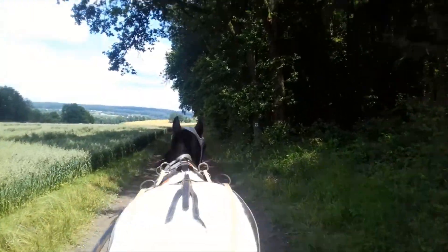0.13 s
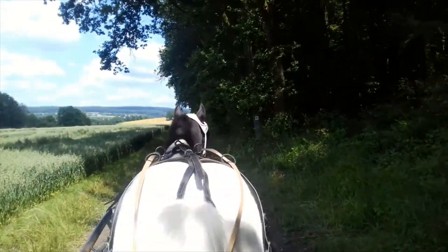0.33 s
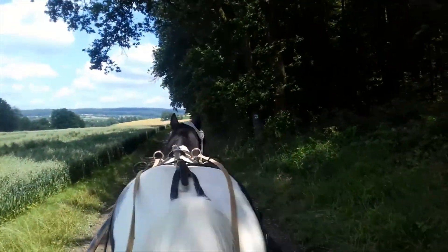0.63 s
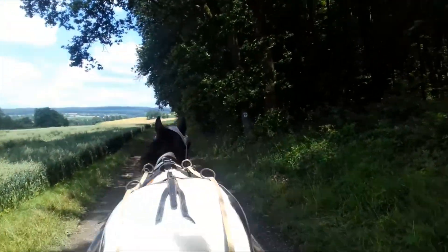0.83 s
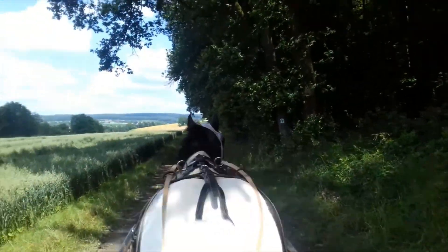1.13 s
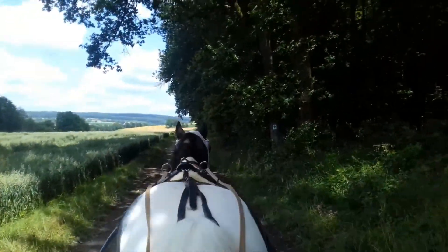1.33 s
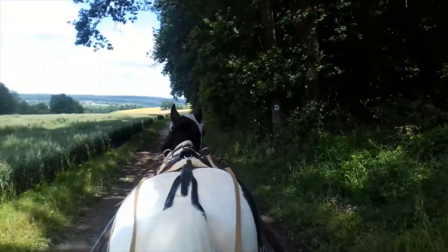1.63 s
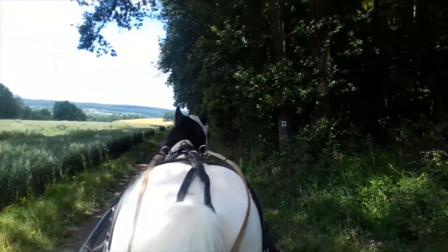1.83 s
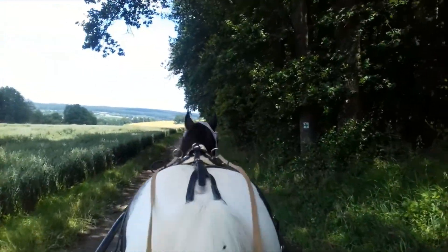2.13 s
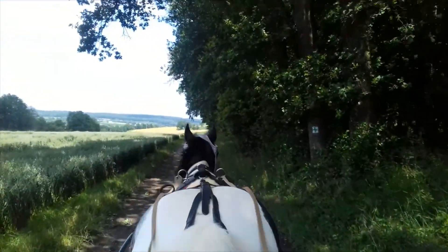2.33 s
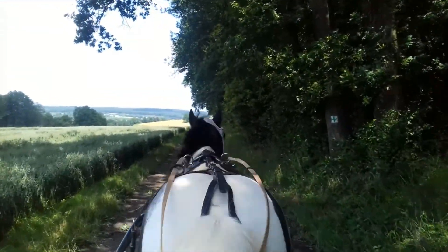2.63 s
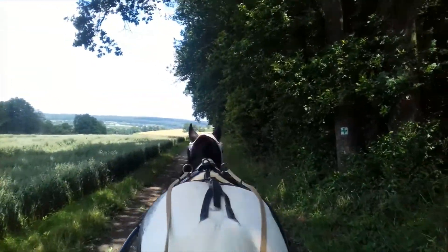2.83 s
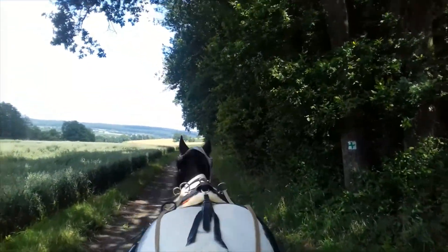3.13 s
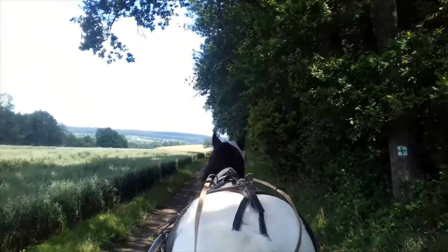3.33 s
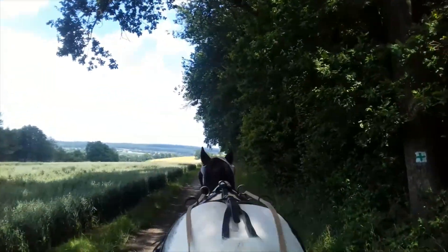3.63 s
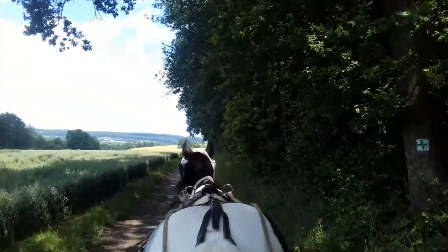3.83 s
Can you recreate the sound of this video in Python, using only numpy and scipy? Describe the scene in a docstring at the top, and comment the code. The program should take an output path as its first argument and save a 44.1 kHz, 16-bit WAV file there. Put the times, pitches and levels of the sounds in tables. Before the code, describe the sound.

Horse-drawn cart rolling along a field path, with dull hoof thuds, harness clinks and buffeting wind.

```python
"""A pony walks a grassy track, heard from the seat of the cart it pulls: hooves knock as resonant noise pushes.
The wheels rumble and crunch as coloured noise, random clicks and tiny ringing stones.
Cart and harness clank and rattle through frame modes, clink in narrow bands, squeak as jittered tones.
Gusts hit the microphone as pressure swings with a rough wake; leaves and grass rustle as noise.
A small bird sings faintly in gliding sines, smeared by the trees."""
import sys
import numpy as np
from scipy import signal
from scipy.fft import rfft, irfft, next_fast_len
from scipy.io import wavfile
from scipy.ndimage import uniform_filter1d

SR = 44100
rng = np.random.default_rng(int(sys.argv[2]) if len(sys.argv) > 2 else 0)


def transcribe(u):
    """Save the signal u as a 16-bit wav file named by the first command-line argument.

    u: samples, shape (n,) or (channels, n), limited to [-1, 1]; the rate is SR.
    q: integer samples, one column per channel.
    """
    v = np.clip(np.atleast_2d(u).T, -1, 1)
    q = np.round(v * 32767).astype(np.int16)
    wavfile.write(sys.argv[1], SR, q)


N = 176400
SHORT_S = np.arange(SR // 4) / SR  # time axis of one event
BLOW_S = .01  # reference length for the energy of a blow
TOP_HZ = 15800

# Leaves and grass, spectrum. Each row: frequency in Hz, gain in dB.
AIR_COLOUR = [(240, -22.5), (500, 3), (750, -12), (1070, 5.5), (1300, 2), (2250, 3), (3200, -14.5),
              (4400, -2), (6100, -14), (7200, -21.5), (15500, -34.5)]
AIR_DB, AIR_SWAY_DB = -43.5, 2.5

# Wheel rumble over time. Each row: time in seconds, level in dB before RUMBLE_TRIM_DB.
RUMBLE_LEVEL = [(0.0, -29.5), (0.41, -36.5), (0.66, -37.5), (0.88, -42.5), (1.06, -39.5), (1.97, -40.5),
                (2.16, -39), (2.34, -43), (2.57, -41), (2.68, -34), (3.1, -40.5), (3.27, -37), (3.54, -35),
                (3.69, -39.5), (3.82, -35.5), (4.0, -26.5)]
# Wheel rumble, spectrum. Each row: frequency in Hz, gain in dB.
RUMBLE_COLOUR = [(20, -64), (45, -10.5), (70, -1.5), (105, 3), (210, 4), (300, -3.5), (450, -15.5),
                 (900, -16.5), (2000, -80)]
RUMBLE_TRIM_DB = 1

# Wheels on grit over time. Each row: time in seconds, common level of grit and stones in dB before their trims.
CRUNCH_LEVEL = [(0.0, -53), (0.55, -47), (0.72, -47), (1.01, -53), (1.3, -48.5), (1.85, -51.5), (2.07, -56),
                (2.19, -46), (2.43, -52), (2.67, -45), (2.93, -48), (3.18, -61), (3.32, -46), (3.5, -57),
                (3.79, -54), (4.0, -45.5)]
# Grit, spectrum. Each row: frequency in Hz, gain in dB.
GRIT_COLOUR = [(300, -37), (700, -6), (1100, 9), (2200, 13), (3100, 6.5), (4300, -16), (6000, 9),
               (7500, -20), (10000, -6), (13000, -20), (16000, -10)]
GRIT_TRIM_DB, GRIT_PER_S, GRIT_SPREAD_DB, GRIT_SURGE_DB = -3, 230, 4, 2.5
# Stones, spectrum. Each row: frequency in Hz, gain in dB.
STONE_COLOUR = [(900, -1), (2200, -1.5), (3100, -7), (4800, -2.5), (7500, -13), (13000, -20.5)]
STONES_PER_S, STONE_TRIM_DB, STONE_SPREAD_DB = 120, 1, 5.5
STONE_LOW_HZ, STONE_HIGH_HZ = 900, 13000
STONE_RING_S, STONE_CYCLES = .0011, 3  # decay: fixed part plus a number of cycles
JIGGLE_DB, JIGGLE_PER_S, JIGGLE_SPREAD_DB = -48, 130, 9.7
JIGGLE_COLOUR = [(1000, -2.5), (2200, 16), (4000, -3.5)]  # (Hz, dB)

# Bird notes. Each row: start in seconds, length in seconds, start in Hz, end in Hz, level in dB.
CHIRPS = [(3.256, 0.044, 4400, 3890, -42), (3.349, 0.038, 3920, 4380, -44.5), (3.518, .05, 5230, 3570, -43),
          (3.583, 0.016, 4200, 4370, -39.5), (3.629, 0.031, 5450, 4000, -41.5),
          (3.683, 0.022, 4100, 3890, -39), (3.722, .025, 5500, 4300, -44), (3.809, 0.023, 5450, 3680, -43),
          (3.875, .016, 4150, 4350, -41.5), (3.893, 0.031, 5450, 3770, -45)]
TREES_DB, TREES_DECAY_S = -2, 0.12

# Gusts on the microphone. Each row: start in seconds, length in seconds, level in dB, central eddy pitch in Hz.
GUSTS = [(0.0, 0.095, -26, 176), (0.096, 0.046, -21, 270), (.18, 0.025, -28.5, 238),
         (0.212, 0.021, -25, 268), (.412, .024, -25, 254), (.472, 0.027, -26, 293),
         (.513, .022, -25.5, 258), (1.22, 0.036, -29.5, 216), (1.625, 0.099, -35.5, 137),
         (2.722, 0.047, -23.5, 260), (3.118, 0.027, -16, 258), (3.152, 0.054, -22, 212),
         (3.42, 0.028, -22, 180), (3.574, 0.026, -25, 201), (3.605, 0.069, -14, 317),
         (3.674, 0.051, -25, 215), (3.885, 0.022, -23, 184), (3.911, .028, -13, 251),
         (3.934, 0.041, -13, 390)]
# Single hard puffs of air. Each row: time in seconds, drive before colouring in dB, pitch in Hz.
PUFFS = [(.102, -28, 523), (0.12, -9, 438), (0.189, -6.5, 255), (.197, 0, 438), (0.268, -16, 160),
         (.322, -15, 226), (.342, -13.5, 202), (0.364, -14, 248), (0.43, -17, 470), (.457, -13.5, 298),
         (0.473, -20, 398), (0.496, -22, 320), (.515, -12, 322), (1.613, -14, 183), (2.288, -18, 183),
         (2.563, -19, 144), (2.731, -12, 330), (2.804, -16, 172), (3.114, -6.5, 314), (3.144, -8.5, 450),
         (3.372, -13, 214), (3.434, -17.5, 276), (3.608, -11.5, 440), (3.643, -7, 410), (3.666, -21, 520),
         (3.752, -14.5, 344), (3.852, -6, 253), (3.911, -7, 475), (3.948, -3, 770), (3.957, -15, 715)]
# Gusts and puffs, spectrum. Each row: frequency in Hz, gain in dB.
WIND_COLOUR = [(25, -31), (60, -9.5), (120, 1), (300, 1), (600, -3), (1200, 3), (2200, 10.5), (4000, -14),
               (8000, -38)]
# Rough wake, spectrum. Each row: frequency in Hz, gain in dB.
WAKE_COLOUR = [(100, -13), (350, 1.5), (800, -5.5), (2500, -31.5), (6000, -69)]
EDDIES_PER_S, EDDY_OCTAVES, EDDY_CYCLES, EDDY_SPREAD_DB = 280, 0.92, .2, 0.5
EDDY_LEAD_S = 1 / 50  # time ahead of an eddy's centre
WAKE_DB, WAKE_S = -13, .012

# Squeaks of fittings. Each row: start in seconds, length in seconds, start in Hz, end in Hz,
# level in dB, overtones in dB.
SQUEAKS = [(0.285, 0.045, 3460, 4020, -34.5, -12), (0.501, .025, 2520, 2720, -41, -27),
           (1.039, 0.02, 4030, 4104, -31, -34), (1.409, 0.035, 4080, 3930, -32, -33),
           (1.73, 0.048, 3620, 3560, -35, -13), (1.768, 0.04, 3350, 4190, -29.5, -16),
           (1.865, 0.022, 4140, 4020, -25, -33), (1.871, 0.027, 3380, 2760, -37, -21)]
SQUEAK_JITTER, SQUEAK_SLIDE_JITTER = 0.017, .2  # ratios; the second per natural log of the slide
SQUEAK_FLICKER_DB, SQUEAK_RING_DB, SQUEAK_RING_S = 3.5, -8, 0.031
# Thin rubs of a wheel. Each row: start in seconds, length in seconds, level in dB.
RUBS = [(0.83, 0.051, -34.5), (2.933, 0.076, -34.5), (3.38, 0.063, -39.5)]
RUB_HZ, RUB_JITTER = 2353, 0.017

# Chain link ticks. Each row: time in seconds, level in dB, pitch in Hz.
TINKS = [(2.521, -36, 7830), (2.614, -45, 8170), (2.877, -62, 8300), (2.946, -41.5, 8100),
         (3.216, -53, 7700), (3.274, -52, 7900), (3.314, -59, 8100)]
# Modes of a chain link. Each row: ratio to the pitch, level in dB.
TINK_MODES = [(1, 5.5), (1.1, -5), (1.48, -17), (1.62, -18)]
TINK_PUSH_S, TINK_WIDTH_HZ = 0.0018, 120
# Pings of a small harness ring. Each row: time in seconds, level in dB.
PINGS = [(0.844, -51), (1.522, -50), (2.046, -49), (3.042, -48.5)]
PING_HZ, PING_DECAY_S, PING_SPREAD_HZ = 8460, 0.066, 122
# Clinks of buckles and rings. Each row: time in seconds, level in dB, pitch in Hz.
CLINKS = [(.349, -22, 1843), (.459, -33, 1535), (.707, -25, 1116), (1.073, -33, 1820), (2.96, -26, 1165),
          (3.329, -28.5, 1674)]
CLINK_PUSH_S, CLINK_WIDTH_HZ = 0.0051, 28

# Dry snaps of tack and twigs. Each row: time in seconds, level in dB, pitch in Hz.
SNAPS = [(.575, -41, 4500), (.702, -38, 5500), (.916, -41, 4500), (1.068, -42, 4800), (1.46, -38, 5000),
         (1.473, -39, 4500), (1.832, -34, 4800), (2.207, -36, 5500), (2.71, -16.5, 1900),
         (2.923, -35, 5200), (3.691, -33, 5200)]
SNAP_DECAY_S, SNAP_SPLINTER_DB, SNAP_WIDTH_RATIO = 0.0025, -5, .65
# Bouts of harness and cart rattle. Each row: centre in seconds, length in seconds, level in dB, main ring in Hz.
RATTLES = [(0.297, 0.079, -42, 1740), (0.347, 0.033, -30, 1810), (0.63, 0.029, -33.5, 1430),
           (0.714, 0.038, -29.5, 1350), (.765, 0.037, -42.5, 1830), (1.074, 0.045, -32.5, 1700),
           (1.254, 0.11, -38, 2120), (1.473, 0.073, -32.5, 1470), (1.585, 0.045, -40, 1400),
           (1.826, 0.083, -31.5, 1490), (2.018, 0.042, -35, 2330), (2.21, 0.078, -29.5, 2260),
           (2.539, 0.047, -34, 1910), (2.598, 0.079, -33, 1570), (2.959, 0.048, -28, 1540),
           (3.089, 0.027, -32.5, 2050), (3.333, 0.052, -33, 1660), (3.7, 0.08, -30, 1400)]
RATTLE_WIDTH_HZ, RATTLE_PER_S, RATTLE_SPREAD_DB = 550, 550, 2.5
RATTLE_FRAME_DB, RATTLE_GRIT_DB = -3.5, -0.5
RATTLE_COLOUR = [(1500, -1.0), (2500, -4.0), (4000, -11.5)]  # (Hz, dB)

# Clanks of shafts and fittings. Each row: time in seconds, level below the split in dB, level above it in dB.
CLANKS = [(0.059, -31, -35.5), (0.702, -50, -41.5), (.835, -53, -39), (1.515, -33.5, -29.5),
          (1.828, -36, -35), (2.043, -15.5, -20), (2.14, -31, -40), (2.294, -45, -37), (2.496, -34, -40),
          (2.778, -19, -20.5), (2.79, -23.5, -36), (2.944, -39, -33), (3.037, -31, -32),
          (3.272, -29.5, -43), (3.668, -34.5, -38), (3.993, -26, -35.5)]
# Modes of the cart's frame. Each row: frequency in Hz, level in dB, t60 in seconds.
FRAME = [(270, -1.5, 0.05), (493.7, -12.5, 0.15), (683, -20.5, 0.3), (1071, -3, 0.082), (1161.5, -11, 0.26),
         (1403, -3.5, 0.039), (1498, -2.5, 0.096), (1838, -4.5, 0.07), (2225, -10.5, 0.14),
         (2700, -8, 0.058), (3000, -6, .04), (3266, -9.5, 0.12), (4020, 4.5, 0.039), (4170, 0, 0.054),
         (4480, 2.5, 0.043), (4575, 6.5, 0.031), (5040, -4.5, 0.031), (5490, 4.5, 0.014),
         (6210, -7.5, 0.056)]
# Crack of a clank, spectrum. Each row: frequency in Hz, gain in dB.
CRACK_COLOUR = [(200, -44), (500, -9.5), (1000, -6.5), (1500, -3), (2300, 3), (3100, -9), (4300, 12.5),
                (5800, 5.5), (7200, -15), (10000, -15), (15000, -72)]
CLANK_HOLD_S, CLANK_DECAY_S, CLANK_TAIL_DB, CLANK_TAIL_S = 0.0014, 0.012, -19.5, 0.062
CLANK_SPLIT_HZ, CRACK_DB = 2500, -3
FRAME_DETUNE = .009  # largest shift of a mode, as a ratio

# Hoof knocks. Each row: time in seconds, level in dB, pitch in Hz.
HOOVES = [(.469, -32.5, 830), (.803, -35.5, 870), (.843, -31.5, 784), (1.544, -32, 834),
          (1.596, -31.5, 786), (1.918, -35.5, 1080), (1.962, -28.5, 970), (2.291, -32.5, 980),
          (2.299, -36.5, 800), (2.337, -28.5, 790), (2.344, -40.5, 850), (2.537, -36, 1000),
          (2.699, -32, 744), (3.038, -32.5, 890), (3.082, -28, 930), (3.451, -33.5, 805), (3.836, -31, 700)]
# Scuff of the soil, spectrum. Each row: frequency in Hz, gain in dB.
SCUFF_COLOUR = [(300, 3), (1000, 18.5), (2500, 14), (5000, -31), (8000, -16), (15000, -35)]
HOOF_DECAY_S, HOOF_WIDTH_RATIO, HOOF_SCUFF_DB, HOOF_CRUSH_DB = 0.0091, 0.29, -6, 2


def undb(db):
    """Decibels to gain."""
    return 10 ** (np.asarray(db) / 20)


def unit(x):
    """Scale to rms 1."""
    return x / np.sqrt(np.mean(x ** 2) + 1e-20)


def burst(x, seconds):
    """Scale so that the energy equals rms 1 held for the given time."""
    return x * np.sqrt(seconds * SR / (np.sum(x ** 2) + 1e-20))


def add(out, start_s, x):
    """Mix a sound in at a time, not before zero."""
    i = max(int(start_s * SR), 0)
    out[i:i + len(x)] += x[:max(len(out) - i, 0)]


def colour(x, points):
    """Causal minimum-phase filter through (Hz, dB) points, by folding the cepstrum."""
    n = next_fast_len(len(x) + 2048, True) // 2 * 2
    hz, db = np.array(points, float).T
    bin_hz = np.arange(n // 2 + 1) * SR / n
    log_gain = np.interp(np.log(bin_hz + 1), np.log(hz), db) * np.log(10) / 20
    cepstrum = irfft(log_gain, n)
    cepstrum[1:n // 2] *= 2
    cepstrum[n // 2 + 1:] = 0
    return irfft(rfft(x, n) * np.exp(rfft(cepstrum)), n)[:len(x)]


def band(x, hz, width_hz):
    """One resonance."""
    return signal.lfilter(*signal.iirpeak(hz, hz / width_hz, fs=SR), x)


def walk(rate_hz, size=N):
    """Smooth random wander of rms 1."""
    k = max(int(SR / rate_hz), 1)
    own_rng = np.random.default_rng(rng.integers(2 ** 31))
    steps = np.repeat(own_rng.standard_normal(size // k + 1), k)
    return unit(uniform_filter1d(uniform_filter1d(steps, k), k)[:size])


def clicks(per_s, spread_db, size=N):
    """Random tiny impacts, a few much harder than the rest."""
    hard = np.minimum(rng.exponential(size=size), 3.2)
    hits = rng.random(size) < per_s / SR
    return hits * np.sign(rng.standard_normal(size)) * undb(spread_db * hard)


def arch(t, length):
    """A smooth rise and fall."""
    return np.sin(np.pi * np.clip(t / length, 0, 1))


def noise_push(decay_s):
    """Decaying noise."""
    return rng.standard_normal(len(SHORT_S)) * np.exp(-SHORT_S / decay_s)


def sine(hz):
    """Sine that follows a frequency track."""
    return np.sin(2 * np.pi * np.cumsum(hz) / SR)


def frame(x):
    """The cart's frame rings in close, beating pairs of modes, detuned afresh each time as its joints work."""
    ring = np.zeros(len(SHORT_S))
    for hz, db, t60_s in FRAME:
        decay = undb(-60 * SHORT_S / t60_s)
        for side, (shift, phase) in zip((-1, 1), rng.random((2, 2))):
            mode_hz = hz * (1 + side * FRAME_DETUNE * shift)
            ring += undb(db) * np.sin(2 * np.pi * (mode_hz * SHORT_S + phase)) * decay
    return signal.fftconvolve(x, ring)[:len(x)]


def stones(per_s, size=N):
    """Small hard things crack together, each with its own pitch and a very short ring."""
    out, t = np.zeros(size), SHORT_S[:SR // 40]
    for when, pitch, force in rng.random((int(per_s * size / SR), 3)):
        hz = STONE_LOW_HZ * (STONE_HIGH_HZ / STONE_LOW_HZ) ** pitch
        hard = min(-np.log(1 - force), 3)
        ring = np.sin(2 * np.pi * hz * t) * np.exp(-t / (STONE_RING_S + STONE_CYCLES / hz))
        add(out, when * size / SR, undb(STONE_SPREAD_DB * hard) * ring)
    return unit(colour(out, STONE_COLOUR))


def leaves():
    """Leaves and grass rustle: coloured noise with a swaying level."""
    sway = undb(AIR_DB + AIR_SWAY_DB * walk(18))
    return sway * unit(colour(rng.standard_normal(N), AIR_COLOUR))


def bird():
    """Soft slurs, then falling whistles with short notes between: gliding sines smeared by the trees."""
    out = np.zeros(N)
    for start_s, length_s, from_hz, to_hz, db in CHIRPS:
        hz = from_hz * (to_hz / from_hz) ** np.minimum(SHORT_S / length_s, 1)
        add(out, start_s, undb(db) * unit(sine(hz)) * arch(SHORT_S, length_s))
    trees = burst(noise_push(TREES_DECAY_S), 1 / SR)
    return out + undb(TREES_DB) * signal.fftconvolve(out, trees)[:N]


def eddy(t, hz, phase):
    """A swirl of air crosses the microphone: one sharp swing of pressure."""
    return np.cos(2 * np.pi * hz * t + phase) / np.cosh(np.clip(t * hz / EDDY_CYCLES, -20, 20))


def wind():
    """Gusts are flurries of eddies of mixed size; some come alone, and all stir up a fine rough wake."""
    out = np.zeros(N)
    t = SHORT_S[:SR // 7] - EDDY_LEAD_S
    for start_s, length_s, db, hz in GUSTS:
        gust = np.zeros(len(t))
        count = max(int(length_s * EDDIES_PER_S), 2)
        for k, (shift, size, turn, force) in enumerate(rng.uniform(-0.924, 1, (32, 4))[:count]):
            place = np.clip((k + .5 + shift) / count, 0, 1)
            swing = eddy(t - place * length_s, hz * 2 ** (EDDY_OCTAVES * size), np.pi * turn)
            gust += undb(EDDY_SPREAD_DB * force) * arch(place, 1) ** 0.098 * swing
        add(out, start_s - EDDY_LEAD_S, undb(db) * burst(colour(gust, WIND_COLOUR), length_s))
    for when_s, db, hz in PUFFS:
        puff = eddy(t, hz, rng.uniform(-0.47, 1))
        add(out, when_s - EDDY_LEAD_S, undb(db) * colour(puff, WIND_COLOUR))
    strength = np.sqrt(np.abs(uniform_filter1d(out ** 2, int(WAKE_S * SR))))
    wake = unit(colour(rng.standard_normal(N), WAKE_COLOUR))
    return out + undb(WAKE_DB) * strength * wake


def squeaks():
    """Stick-slip in the fittings: short rough tones with overtones, which leave a noisy ring."""
    out = np.zeros(N)
    for start_s, length_s, from_hz, to_hz, db, overtone_db in SQUEAKS:
        # rougher the further it slides
        jitter = SQUEAK_JITTER + SQUEAK_SLIDE_JITTER * abs(np.log(to_hz / from_hz))
        glide_hz = np.interp(SHORT_S, [0, length_s], [from_hz, to_hz])
        hz = glide_hz * (1 + jitter * walk(1400, size=len(SHORT_S)))
        overtones = sine(2 * hz) + undb(-10) * sine(3 * hz)
        flicker = undb(SQUEAK_FLICKER_DB * walk(570, size=len(SHORT_S)))
        tone = (sine(hz) + undb(overtone_db) * overtones) * arch(SHORT_S, length_s) ** 1.35 * flicker
        ring = signal.fftconvolve(tone, noise_push(SQUEAK_RING_S))[:len(SHORT_S)]
        sound = burst(tone, length_s / 2) + undb(SQUEAK_RING_DB) * burst(ring, length_s / 2)
        add(out, start_s, undb(db) * sound)
    return out


def rubs():
    """A wheel rubs by stick-slip: a thin tone of jittering pitch."""
    out = np.zeros(N)
    for start_s, length_s, db in RUBS:
        hz = RUB_HZ * (1 + RUB_JITTER * walk(522, size=len(SHORT_S)))
        add(out, start_s, undb(db) * unit(sine(hz)) * arch(SHORT_S, length_s))
    return out


def tinks():
    """Chain links touch: tiny bright ticks with a few short modes."""
    out = np.zeros(N)
    for when_s, db, hz in TINKS:
        push = noise_push(TINK_PUSH_S)
        ring = np.zeros(len(SHORT_S))
        for ratio, mode_db in TINK_MODES:
            mode = band(band(push, hz * ratio, TINK_WIDTH_HZ), hz * ratio, hz / 2)
            ring += undb(mode_db) * unit(mode)
        add(out, when_s, undb(db) * burst(ring, BLOW_S / 2))
    return out


def pings():
    """A small harness ring pings high: four close sines beat and decay."""
    out = np.zeros(N)
    for when_s, db in PINGS:
        mode_hz = PING_HZ + PING_SPREAD_HZ * rng.standard_normal(size=4)
        ping = sum(np.sin(2 * np.pi * hz * SHORT_S) for hz in mode_hz)
        add(out, when_s, undb(db) * burst(ping * np.exp(-SHORT_S / PING_DECAY_S), BLOW_S))
    return out


def clinks():
    """A buckle or ring chatters briefly, a noise push, and sounds its one note."""
    out = np.zeros(N)
    for when_s, db, hz in CLINKS:
        note = band(band(noise_push(CLINK_PUSH_S), hz, CLINK_WIDTH_HZ), hz, hz / 2)
        add(out, when_s, undb(db) * burst(note, BLOW_S))
    return out


def snaps():
    """Tack and twigs snap: an impulse and splintering noise through a broad resonance."""
    out = np.zeros(N)
    for when_s, db, hz in SNAPS:
        tick = undb(SNAP_SPLINTER_DB) * burst(noise_push(SNAP_DECAY_S), 1 / SR)
        tick[0] += 1
        width_hz = hz * SNAP_WIDTH_RATIO
        add(out, when_s, undb(db) * burst(band(band(tick, hz, width_hz), hz, width_hz), BLOW_S / 4))
    return out


def rattles():
    """Buckles, chains and boards shake in bouts: clicks ring a band and the frame, amid tiny cracks."""
    out = np.zeros(N)
    for centre_s, length_s, db, hz in RATTLES:
        bout = arch(SHORT_S, length_s)
        shake = clicks(RATTLE_PER_S, RATTLE_SPREAD_DB, size=len(SHORT_S)) * bout
        own_ring = band(band(shake, hz, RATTLE_WIDTH_HZ), hz, hz)
        frame_ring = frame(colour(shake, RATTLE_COLOUR))
        cracks = stones(2 * RATTLE_PER_S, size=len(SHORT_S)) * bout
        sound = unit(own_ring)
        sound += undb(RATTLE_FRAME_DB) * unit(frame_ring)
        sound += undb(RATTLE_GRIT_DB) * unit(cracks)
        add(out, centre_s - length_s / 2, undb(db) * burst(sound, length_s / 2))
    return out


def clanks():
    """Loose metal chatters against the frame for a moment and leaves it ringing."""
    out = np.zeros(N)
    push = np.exp(-np.maximum(SHORT_S - CLANK_HOLD_S, 0) / CLANK_DECAY_S)
    tail = undb(CLANK_TAIL_DB) * np.exp(-SHORT_S / CLANK_TAIL_S)
    for when_s, body_db, bright_db in CLANKS:
        chatter = clicks(5000, 0.5, size=len(SHORT_S))
        crack = colour(chatter * (push + tail), CRACK_COLOUR)
        hit = unit(frame(chatter * push)) + undb(CRACK_DB) * unit(crack)
        for side, db in (("low", body_db), ("high", bright_db)):
            part = signal.sosfilt(signal.butter(3, CLANK_SPLIT_HZ, side, fs=SR, output="sos"), hit)
            add(out, when_s, undb(db) * burst(part, 2 * BLOW_S))
    return out


def rumble():
    """The wheels rumble: low noise under a level curve with a small wander."""
    level_db = np.interp(np.arange(N) / SR, *np.array(RUMBLE_LEVEL).T)
    level = undb(level_db + RUMBLE_TRIM_DB + 0.5 * walk(23.47))
    return unit(colour(rng.standard_normal(N), RUMBLE_COLOUR)) * level


def crunch():
    """The wheels crunch grit and stones, and random impacts jiggle the frame, under one level curve."""
    level = undb(np.interp(np.arange(N) / SR, *np.array(CRUNCH_LEVEL).T))
    surge = undb(GRIT_TRIM_DB + GRIT_SURGE_DB * np.minimum(walk(50), 1))
    grit = unit(colour(clicks(GRIT_PER_S, GRIT_SPREAD_DB), GRIT_COLOUR)) * level * surge
    cracks = undb(STONE_TRIM_DB) * stones(STONES_PER_S) * level
    shake = colour(clicks(JIGGLE_PER_S, JIGGLE_SPREAD_DB), JIGGLE_COLOUR)
    jiggle = undb(JIGGLE_DB) * unit(frame(shake) * level)
    return grit + cracks + jiggle


def hooves():
    """Each hoof gives a short hollow knock, and crushes and scuffs the soil."""
    out = np.zeros(N)
    for when_s, db, hz in HOOVES:
        push = undb(HOOF_CRUSH_DB) * burst(noise_push(HOOF_DECAY_S), 1 / SR)
        push[0] += 1
        width_hz = hz * HOOF_WIDTH_RATIO
        knock = band(band(push, hz, width_hz), hz, 2 * width_hz)
        scuff = colour(push, SCUFF_COLOUR)
        sound = burst(knock, BLOW_S) + undb(HOOF_SCUFF_DB) * burst(scuff, BLOW_S)
        add(out, when_s, undb(db) * sound)
    return out


def scene():
    """Everything as heard from the seat, one channel."""
    background = leaves() + bird() + wind()
    harness = squeaks() + rubs() + tinks() + pings() + clinks() + snaps() + rattles()
    cart = clanks() + rumble() + crunch()
    return (background + harness + cart + hooves())[None]


def record(dry):
    """Steep low-pass that cuts the top."""
    return signal.sosfilt(signal.ellip(10, .2, 70, TOP_HZ, fs=SR, output="sos"), dry)


dry = scene()
out = record(dry)
transcribe(out)
```